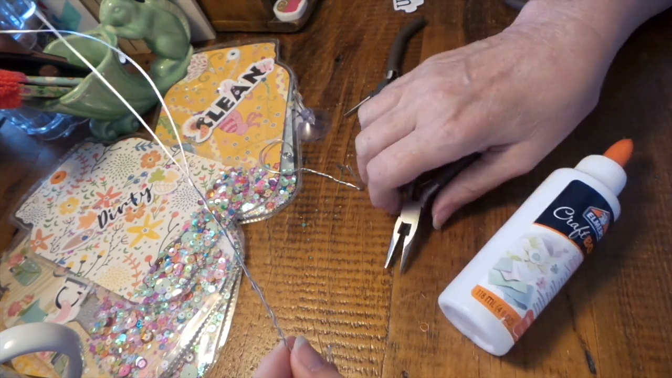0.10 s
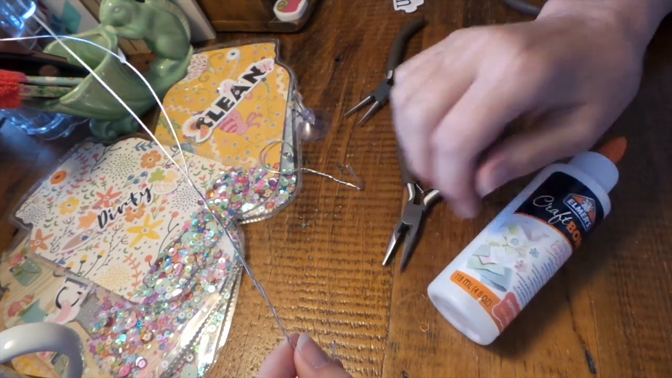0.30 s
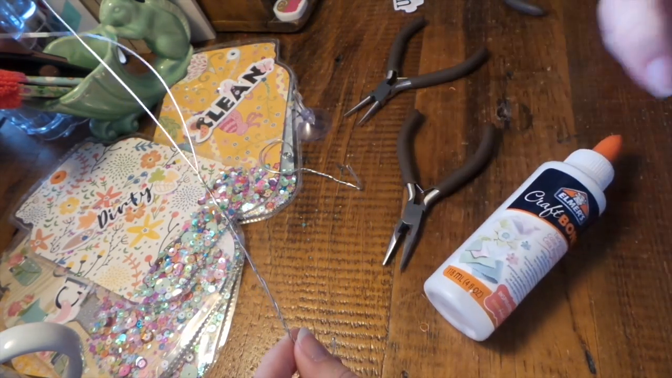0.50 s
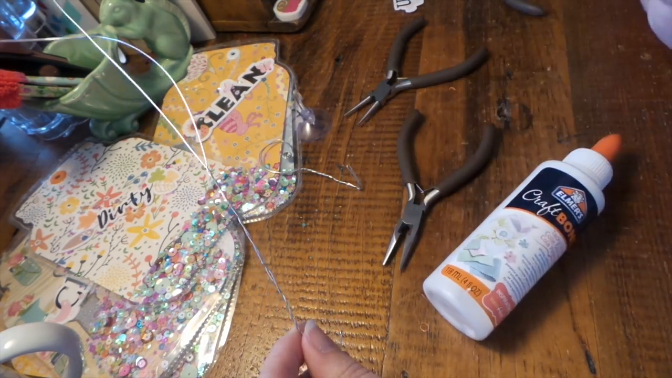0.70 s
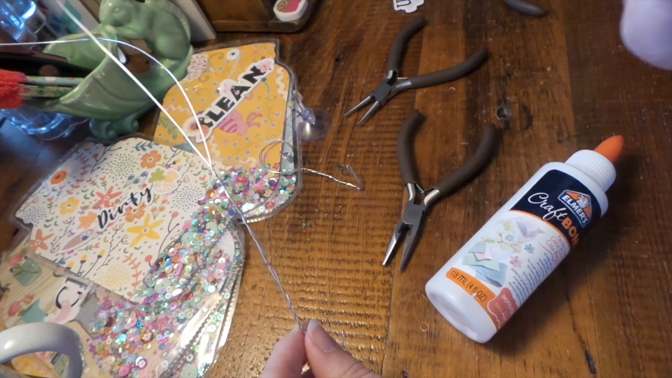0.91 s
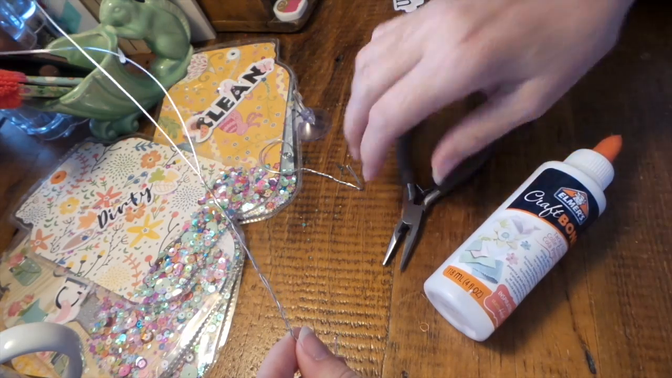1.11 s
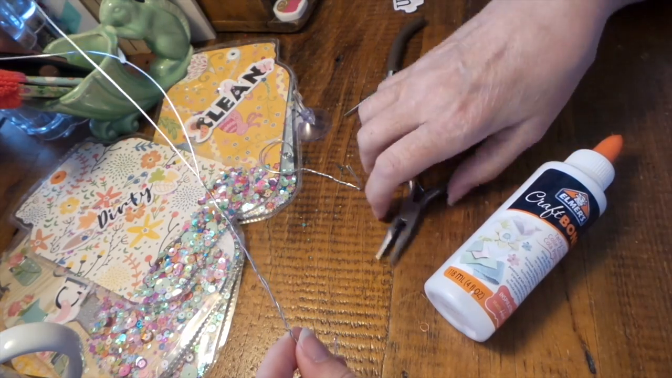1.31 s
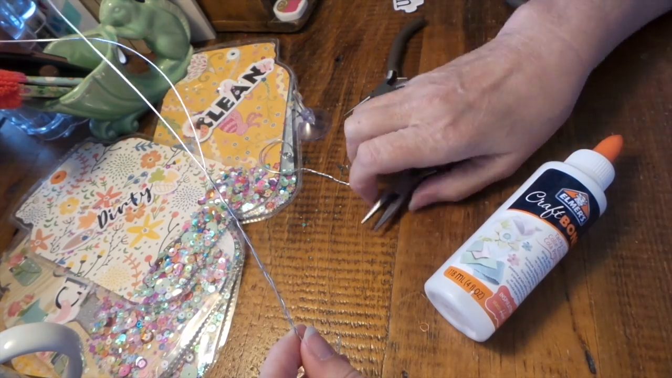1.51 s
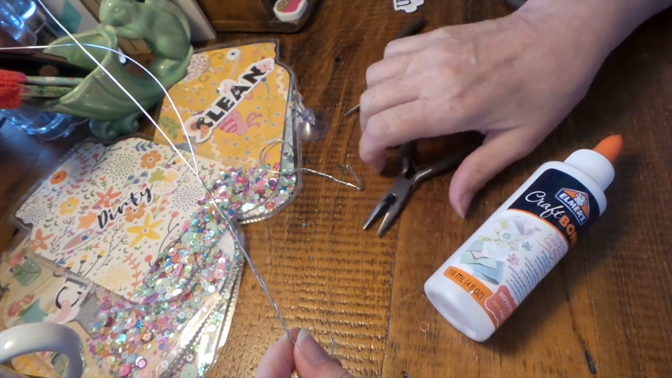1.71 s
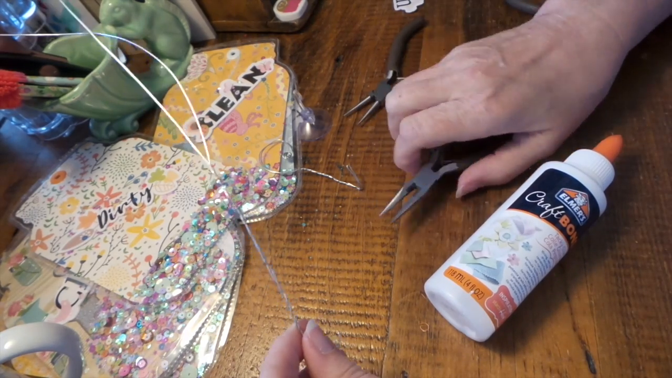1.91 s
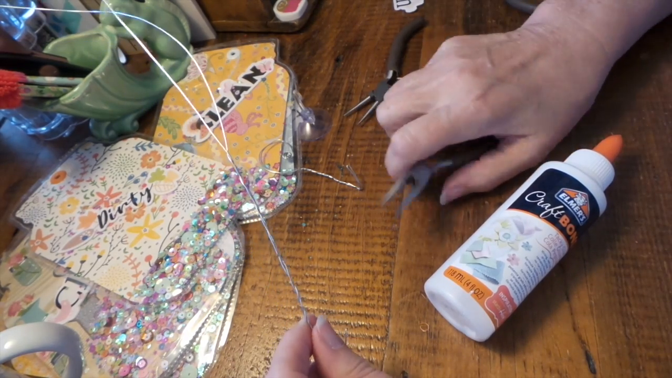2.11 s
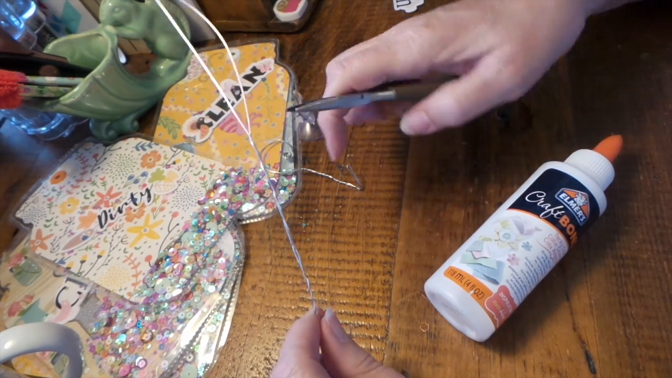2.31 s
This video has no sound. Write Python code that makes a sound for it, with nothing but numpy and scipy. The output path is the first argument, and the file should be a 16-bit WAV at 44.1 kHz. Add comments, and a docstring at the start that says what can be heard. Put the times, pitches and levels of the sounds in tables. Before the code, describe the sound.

Close, dry sound of hand pliers set down on wood, jaws jangling briefly; after a quiet pause with tiny ticks, they are touched, slid and knocked twice, then lifted, over a faint low hum.

```python
"""A small room with a low hum: small steel pliers are put down on a wooden craft table and rattle to rest.
The jaws jangle, wire ticks faintly; a hand lands on the pliers, slides them, knocks them twice and lifts them.
Contacts are shaped noise bursts; table and steel ring as struck resonators; rattles are runs of touches.
Slides are random slips, brushes are high hiss; the room is decaying noise, its hum wavering tones in soft air."""
import sys
import numpy as np
from scipy import signal
from scipy.fft import rfft, irfft
from scipy.io import wavfile
from scipy.ndimage import uniform_filter1d

SR = 44100
rng = np.random.default_rng(int(sys.argv[2]) if len(sys.argv) > 2 else 0)


def int16_out(signal):
    """Quantize to a 16-bit WAV file."""
    q = np.round(np.clip(np.atleast_2d(signal).T, -1, 1) * 32767)
    wavfile.write(sys.argv[1], SR, q.astype(np.int16))


N = 110250

# air noise: [f/Hz, level/dB per third octave before the swing]
AIR_LEVEL_DB = [(25, -86.5), (50, -73.5), (80, -65.5), (110, -54), (150, -58.5), (200, -56.5), (260, -56.5),
                (330, -65.5), (500, -63.5), (800, -66.5), (1300, -69.5), (2500, -74), (5000, -74),
                (10000, -74), (13000, -71), (16000, -74)]
# swing of air and hum together: [t/s, level/dB]
BACKGROUND_SWING_DB = [(0, 4.5), (.6, 2.5), (1.0, -1), (1.6, 4.5), (2.0, 5.5), (2.2, -1), (2.5, 0)]
# hum tones: [f/Hz, level/dB before the swing, cutoff of the waver/Hz]
HUM_TONES = [(117.7, -50, 2.4), (188.6, -56.5, 1.4), (266.7, -53.5, 15.5), (387, -63.5, 12)]
HUM_WAVER = 0.5   # rms of the waver against the steady tone

# light ticks of wire and fingers: [t/s, tick level/dB, body level/dB, knock level/dB, clack level/dB]
TICKS = [(0.109, -55.5, -53, -57.5, -59.5), (0.153, -49.5, -48, -59, -62), (0.5499, -54, -46, -56, -61),
         (0.6495, -56.5, -55.5, -54.5, -59.5), (0.684, -71, -50, -50, -62),
         (0.7015, -65, -70.5, -51.5, -56), (0.8812, -50.5, -47, -46, -45), (1.013, -74, -51.5, -71, -67.5),
         (1.0825, -47, -43.5, -38, -45.5), (1.194, -76, -37, -38.5, -50), (0.889, -56, -62, -46, -54),
         (1.0905, -55, -48, -48, -54), (1.3625, -46, -46, -64, -54), (1.4655, -47, -62, -72, -77),
         (1.8588, -45, -48.5, -48, -57), (1.9015, -77, -46.5, -53.5, -54), (1.9726, -51.5, -52, -54.5, -61)]
# centres of body, knock, clack, tick: [f/Hz]
TICK_HZ = [720, 1260, 2650, 5600]
# colour of a tick: [f/Hz, level/dB per third octave]
TICK_COLOUR_DB = [(30, -53), (100, -10), (300, -12), (700, -1.5), (930, -5), (1180, 0.5), (1450, -4.5),
                  (1750, -2.5), (2600, -5), (5000, -7), (8000, -11), (14000, -10)]
# pliers touch the table: [t/s, then level/dB of tick, boom, thud, body, knock, clack, ping]
KNOCKS = [(0.2265, -26.5, -24, -19.5, -29, -33, -26.5, -23.5), (0.2699, -43, -52, -42, -33, -56, -35, -40),
          (0.2831, -25.5, -26, -19.5, -16.5, -15, -24.5, -31), (0.288, -25, -37, -19, -28, -23, -39, -27.5),
          (0.2945, -30, -64, -24, -13, -23, -27, -40), (0.2995, -29, -21.5, -17.5, -16.5, -24, -35.5, -37),
          (0.3127, -40, -28, -28, -31, -21, -36, -41), (0.3243, -34, -56, -29, -21.5, -34, -46, -36),
          (0.3447, -35, -46, -43, -44, -50, -46, -40), (0.36, -34, -28, -20.5, -16.5, -31, -39.5, -36.5),
          (0.3652, -41, -24, -16.5, -25.5, -35, -38, -40), (0.3908, -38, -35, -28, -23, -35, -42, -43),
          (0.402, -32, -26.5, -18.5, -27, -32.5, -38, -35.5), (0.4175, -36, -21, -47, -32, -50, -43, -40.5),
          (0.4315, -42, -58, -43, -48, -39, -68, -42),
          (1.2663, -30, -25.5, -17.5, -24.5, -38.5, -35.5, -35.5),
          (1.2748, -39, -21, -22.5, -24.5, -37, -39, -36), (1.2838, -49, -20, -35, -31, -54, -48, -50.5),
          (1.4015, -66, -38.5, -29, -41.5, -53, -54, -52),
          (1.4884, -26.5, -34.5, -19, -20, -25, -20, -26.5), (1.5092, -30, -33, -24, -28, -29.5, -23, -34),
          (1.5202, -40.5, -41, -35, -35, -46, -37, -35), (1.7016, -26.5, -36.5, -19, -28.5, -12, -27, -27),
          (1.715, -40, -26, -40, -23, -36, -31, -49), (1.7295, -42, -27, -29, -43.5, -41, -42, -44),
          (1.7405, -55, -39, -40, -64, -42, -46, -49.5), (1.7575, -37, -47, -28, -39, -45, -48.0, -34),
          (1.763, -29, -37, -32.5, -28, -28, -25.5, -40.5), (1.7785, -43, -26.5, -27, -39, -47, -48, -39),
          (1.786, -39.5, -54, -48, -44, -42, -45, -46)]
# centres of boom, thud, body, knock, clack, ping, tick: [f/Hz]
KNOCK_HZ = [105, 280, 720, 1350, 2600, 6000, 12000]
# colour of a knock's crack: [f/Hz, level/dB per third octave]
KNOCK_COLOUR_DB = [(30, -33), (60, -28), (115, -2), (150, -6.5), (250, -2), (500, -6), (1300, -2),
                   (2000, -3.5), (2700, -4.5), (3600, -9.5), (4250, -4), (5800, -8), (6800, -7),
                   (8300, -2.5), (10000, -8), (13500, 0), (16000, -12)]
CRACK_SPAN_S = 0.0087   # a contact's level is its mean over this time
PUSH_DB, CONTACT_S = -3.5, 0.00063   # first push: level against the scatter, decay time constant
SCATTER_RISE_S, SCATTER_EVEN_HZ = 0.0008, 936   # time constant; spectrum is evened over this width
KNOCK_SCATTER_T60_S, TICK_SCATTER_T60_S = 0.019, 0.022

# room reflections: [f/Hz, level/dB against the direct sound]
ROOM_LEVEL_DB = [(100, -17), (250, -13), (700, -8.5), (1500, -9), (3000, -12), (7000, -16), (15000, -15)]
# room decay: [f/Hz, t60/s]
ROOM_T60_S = [(100, .6), (300, 0.25), (1200, 0.27), (3000, 0.21), (8000, 0.16), (15000, 0.17)]
ROOM_DELAY_S = 0.0092

# ring of the wood and the steel lying on it: [f/Hz, t60/s]
RING_T60_S = [(120, .18), (250, .11), (600, .07), (1400, .08), (2500, .052), (4000, .045), (14000, .035)]
# table-top modes: [f/Hz, level/dB before TABLE_DB]
TABLE_MODES = [(118, 4), (185, 0.5), (245, 2), (376, -0.5), (441, -0.5), (543, -3.5), (599, -5.5), (705, 3),
               (917, -26), (992, -6), (1073, 1.5), (1150, -14), (1290, -2), (1372, -5.5), (1444, -12),
               (1590, -8), (1970, -6.5)]
# pliers modes: [f/Hz, level/dB before STEEL_DB]
STEEL_MODES = [(2190, -1), (2560, 5), (2860, -1), (3060, -0.5), (3300, -5), (3950, -4.5), (4280, -4),
               (6640, 4), (7600, -9.5), (8500, -2.5), (10230, -5), (12600, -4), (13150, -4), (14000, -9)]
TABLE_DB, STEEL_DB, STRIKE_SPREAD_DB = -6, -4.5, 1.5

# loose jaws jangle until the wood stops them: [t/s, length/s, level/dB]
JANGLES = [(.23, .014, -55), (.365, 0.017, -37.5), (.391, 0.029, -39.5), (1.368, .022, -37),
           (1.49, 0.0118, -31.5)]
# jaw modes: [f/Hz, relative level/dB, t60/s]
JAW_MODES = [(4060, -1.5, .04), (4200, -6, 0.027), (7430, -3, 0.018), (8500, 0, 0.01)]
# loose things on the table chatter after a hard knock: [t/s, length/s, level/dB]
CHATTERS = [(.297, 0.058, -31.5), (1.712, 0.046, -30)]
# modes of the loose things: [f/Hz, relative level/dB, t60/s]
CHATTER_MODES = [(1073, 7, 0.0235), (1396, 7, 0.0083), (1630, 2.5, 0.018), (2090, 0.5, 0.013)]
JANGLE_TOUCHES_PER_S, CHATTER_TOUCHES_PER_S = 560, 500
RATTLE_FADE_DB = 10   # weakening of the touches over one run

# pliers slide over the wood: [start t/s, loudest t/s, end t/s, peak level/dB]
SLIDES = [(0.33, 0.338, 0.46, -35), (1.349, 1.388, 1.411, -28.5), (1.28, 1.314, 1.36, -39),
          (1.389, 1.43, 1.69, -49), (1.71, 1.723, 1.80, -41), (1.78, 1.86, 2.2, -62)]
# colour of a slide: [f/Hz, relative level/dB per third octave]
SLIDE_COLOUR_DB = [(100, -5), (400, 6.5), (1200, 7.5), (2600, 7.5), (4100, 3.5), (5500, 5.5), (8000, 10),
                   (11000, 12.5), (16000, 4)]
SLIPS_PER_S, SLIP_SPREAD_DB = 3500, 3.5
SLIDE_FADE_DB = 17   # depth below the peak at either end

# the arm brushes past: [centre t/s, half length/s, peak level/dB]
BRUSHES = [(0.915, .1, -59), (2.215, 0.023, -62)]
# brush pass band, lower and upper edge: [f/Hz]
BRUSH_HZ = [6800, 15300]

BAND_EDGES_HZ = 22 * 2 ** (np.arange(30) / 3)
LOW_CUT_HZ, CUTOFF_HZ = 92, 16000


def from_db(db):
    """Decibels to gain."""
    return 10 ** (np.asarray(db) / 20)


def rms_one(x):
    """Scale to rms 1."""
    return x / np.sqrt(np.mean(x ** 2) + 1e-20)


def unit_energy(x):
    """Scale each row to energy 1."""
    return x / np.sqrt(np.sum(x ** 2, axis=-1, keepdims=True) + 1e-20)


def decay(t, t60_s):
    """Exponential fall of 60 dB in t60_s."""
    return np.exp(-np.log(1000) * t / t60_s)


def at_hz(points, hz):
    """Read a table on a log-frequency axis."""
    freqs_hz, values = np.transpose(points)
    return np.interp(np.log(hz), np.log(freqs_hz), values)


def filtered(x, hz, kind):
    """Second-order Butterworth filter."""
    return signal.sosfilt(signal.butter(2, hz, kind, fs=SR, output="sos"), x)


def bands():
    """Third-octave centres and band-passes."""
    for low_hz, high_hz in zip(BAND_EDGES_HZ, BAND_EDGES_HZ[1:]):
        sos = signal.butter(2, [low_hz, high_hz], "band", fs=SR, output="sos")
        yield np.sqrt(low_hz * high_hz), sos


def place(rows, sounds):
    """Lay one sound at the time of each row."""
    out = np.zeros(N + SR)
    for row, sound in zip(rows, sounds):
        start = int(row[0] * SR)
        out[start:start + len(sound)] += sound
    return out[:N]


def strength_db(rows, centres_hz, hz):
    """Drive of each contact at hz; the tick, first in the row, is the highest part."""
    log_centres = np.log(centres_hz)
    return np.array([np.interp(np.log(hz), log_centres, [*lower, tick]) for _, tick, *lower in rows])


def shaped(x, gain):
    """Minimum-phase filter: causal, given gain per frequency, most compact attack."""
    cepstrum = irfft(np.log(gain + 1e-9))
    half = cepstrum.shape[-1] // 2
    cepstrum[:, 1:half] *= 2
    cepstrum[:, half + 1:] = 0
    return irfft(rfft(x) * np.exp(rfft(cepstrum)))


def air():
    """Soft noise, levelled per third octave."""
    out = np.zeros(N)
    for hz, sos in bands():
        noise = signal.sosfilt(sos, rng.standard_normal(N + SR // 4))[-N:]   # filter settled
        out += from_db(at_hz(AIR_LEVEL_DB, hz)) * rms_one(noise)
    return out


def hum():
    """Appliance tones; slow noise on sine and cosine wavers level and phase."""
    t, out = np.arange(N) / SR, np.zeros(N)
    for hz, db, width_hz in HUM_TONES:
        slow = filtered(rng.standard_normal((2, N + SR)), width_hz, "low")[:, SR:]
        in_phase, quadrature = HUM_WAVER * rms_one(slow[0]), HUM_WAVER * rms_one(slow[1])
        phase = 2 * np.pi * (hz * t + rng.random())
        tone = (1 + in_phase) * np.sin(phase) + quadrature * np.cos(phase)
        out += from_db(db) * rms_one(tone)
    return out


def background():
    """Air and hum under a common level swing."""
    swing_db = np.interp(np.arange(N) / SR, *np.transpose(BACKGROUND_SWING_DB))
    return (air() + hum()) * from_db(swing_db)


def cracks(rows, centres_hz, colour_db, t60_s):
    """A short push and milliseconds of scatter per contact, coloured by the point of impact."""
    t = np.arange(4096) / SR
    hz = np.maximum(np.fft.rfftfreq(len(t), 1 / SR), 10)
    envelope = decay(t, t60_s) * (1 - np.exp(-t / SCATTER_RISE_S))
    scatter = unit_energy(rng.standard_normal((len(rows), len(t))) * envelope)
    push = np.exp(-t / CONTACT_S)
    burst = scatter - from_db(PUSH_DB) * push / push.sum()
    # even out the burst's own spectrum, then impose the wanted one
    even_bins = int(SCATTER_EVEN_HZ * len(t) / SR)
    power = uniform_filter1d(np.abs(rfft(burst)) ** 2, even_bins, axis=1)
    third_octave = (2 ** (1 / 6) - 2 ** (-1 / 6)) * hz / (SR / 2)   # share of the full band
    wanted = from_db(strength_db(rows, centres_hz, hz) + at_hz(colour_db, hz))
    gain = wanted * np.sqrt(CRACK_SPAN_S * SR / (third_octave * power))
    return place(rows, shaped(burst, gain))


def ticks():
    """Light contacts of wire and fingers: crack only, no ring."""
    return cracks(TICKS, TICK_HZ, TICK_COLOUR_DB, TICK_SCATTER_T60_S)


def room(x):
    """Diffuse reflections as delayed noise, with level and decay set per third octave."""
    t = np.arange(SR * 2 // 3) / SR
    response = np.zeros(len(t))
    for hz, sos in bands():
        fall = decay(t, at_hz(ROOM_T60_S, hz)) * (t > ROOM_DELAY_S)
        # 1e-18 keeps the filters clear of denormals
        band_share = np.sqrt(np.sum(signal.sosfilt(sos, (t == 0) + 1e-18) ** 2))
        tail = signal.sosfilt(sos, rng.standard_normal(len(t)) * fall + 1e-18)
        response += band_share * from_db(at_hz(ROOM_LEVEL_DB, hz)) * unit_energy(tail)
    return signal.fftconvolve(x, response)[:N]


def ringing(modes):
    """Two-pole resonators, each struck by every knock at its own strength; high modes die sooner."""
    out = np.zeros(N)
    for hz, db in modes:
        spread_db = STRIKE_SPREAD_DB * rng.standard_normal(len(KNOCKS))
        hits = from_db(strength_db(KNOCKS, KNOCK_HZ, hz) + db + spread_db)
        strikes = place(KNOCKS, hits[:, None]) + 1e-18
        radius = decay(1 / SR, at_hz(RING_T60_S, hz))
        angle = 2 * np.pi * hz / SR
        out -= signal.lfilter([0, np.sin(angle)], [1, -2 * radius * np.cos(angle), radius ** 2], strikes)
    return out


def pliers():
    """Steel on wood: crack, table-top thud, ring of the tool."""
    crack = cracks(KNOCKS, KNOCK_HZ, KNOCK_COLOUR_DB, KNOCK_SCATTER_T60_S)
    table = from_db(TABLE_DB) * ringing(TABLE_MODES)
    steel = from_db(STEEL_DB) * ringing(STEEL_MODES)
    return crack + table + steel


def rattles(rows, modes, touches_per_s):
    """Runs of quick, uneven, weakening touches re-excite a few short rings."""
    t, runs = np.arange(SR // 8) / SR, []
    for _, length_s, db in rows:
        times = np.cumsum(rng.uniform(0.3, 1.7, 64))   # in mean intervals
        samples = (SR * (times - times[0]) / touches_per_s).astype(int)
        touches = np.bincount(samples, minlength=len(t))[:len(t)]
        touches = touches * from_db(-RATTLE_FADE_DB * t / length_s) * (t < length_s)
        run = np.zeros(len(t))
        for hz, mode_db, t60_s in modes:
            note = np.sin(2 * np.pi * hz * t) * decay(t, t60_s)
            ring = signal.fftconvolve(touches * rng.standard_normal(len(t)), note)
            run = from_db(mode_db) * unit_energy(ring) + np.pad(run, (0, len(ring) - len(run)))
        runs.append(from_db(db) * np.sqrt(length_s * SR) * unit_energy(run))
    return place(rows, runs)


def jangles():
    """Touches of the loose jaws excite steel modes."""
    return rattles(JANGLES, JAW_MODES, JANGLE_TOUCHES_PER_S)


def chatters():
    """Touches of loose things on the table excite lower modes."""
    return rattles(CHATTERS, CHATTER_MODES, CHATTER_TOUCHES_PER_S)


def slides():
    """Dense tiny slips over the grain swell and fade with each push."""
    t = np.arange(N) / SR
    slips = (rng.random(N) < SLIPS_PER_S / SR) * rng.choice([-1, 1], N)
    slips = slips * from_db(SLIP_SPREAD_DB * rng.standard_normal(N))
    push = np.zeros(N)
    for start_s, top_s, end_s, db in SLIDES:
        fade_db = SLIDE_FADE_DB * np.interp(t, [start_s, top_s, end_s], [1, 0, 1])
        push += from_db(db - fade_db) * (t > start_s) * (t < end_s)
    scrape = np.zeros(N)
    for hz, sos in bands():
        band = signal.sosfilt(sos, slips * rng.standard_normal(N))
        scrape += from_db(at_hz(SLIDE_COLOUR_DB, hz)) * rms_one(band)
    return push * rms_one(scrape)


def brushes():
    """Faint high rustle of the arm: band-passed noise under Gaussian swells."""
    t = np.arange(N) / SR
    hiss = rms_one(filtered(rng.standard_normal(N), BRUSH_HZ, "band"))
    return hiss * sum(from_db(db) * np.exp(-((t - t_s) / half_s) ** 2) for t_s, half_s, db in BRUSHES)


def scene():
    """Work on the table, low-cut, with its room and the background."""
    work = ticks() + pliers() + jangles() + chatters() + slides() + brushes()
    work = filtered(work, LOW_CUT_HZ, "high")
    return (work + room(work) + background())[None]


def record(dry):
    """tanh rounds the peaks; a steep low-pass cuts the top."""
    low_pass = signal.ellip(10, 0.2, 90, CUTOFF_HZ, fs=SR, output="sos")
    return signal.sosfilt(low_pass, np.tanh(dry))


dry = scene()
out = record(dry)
int16_out(out)
```